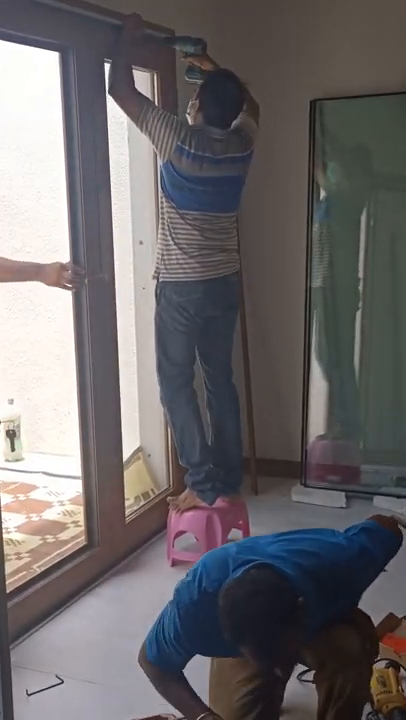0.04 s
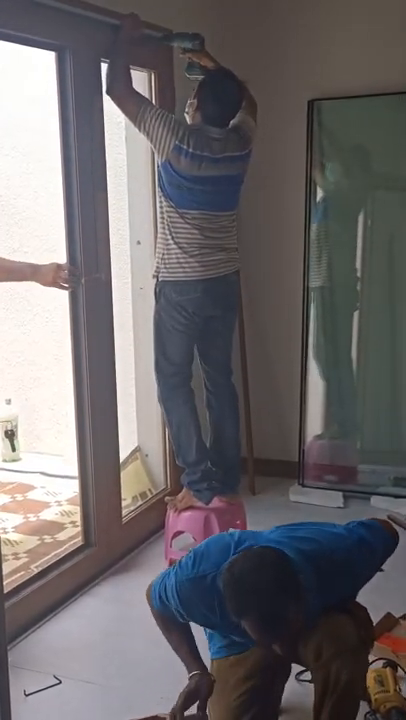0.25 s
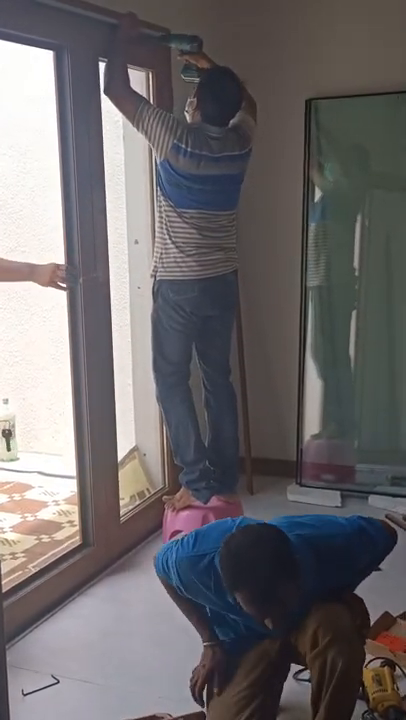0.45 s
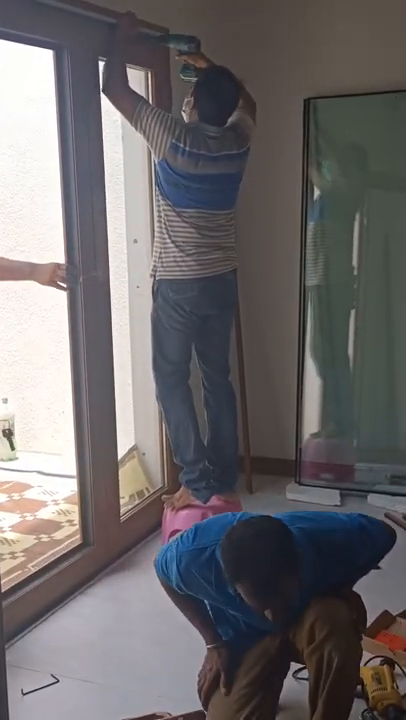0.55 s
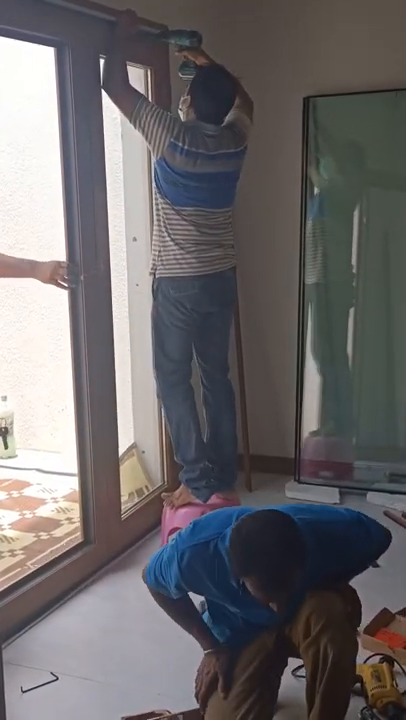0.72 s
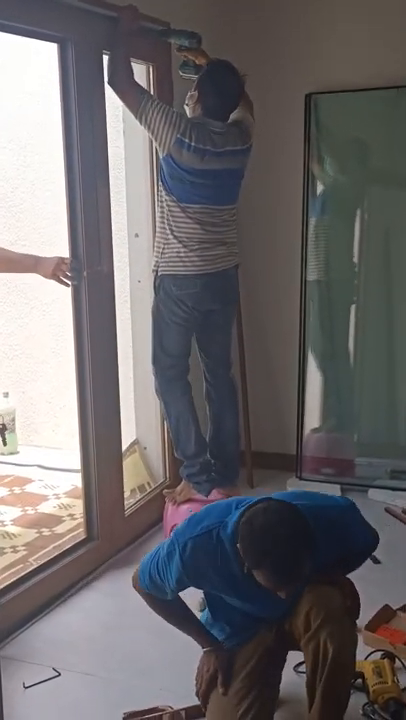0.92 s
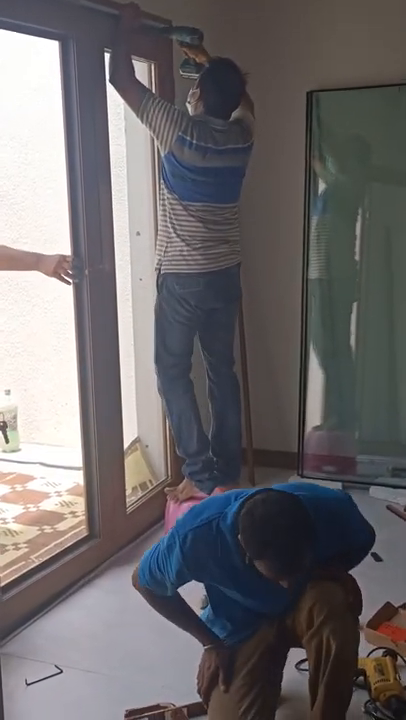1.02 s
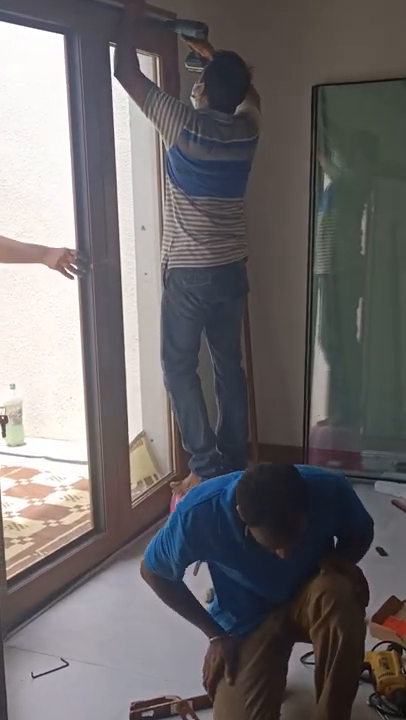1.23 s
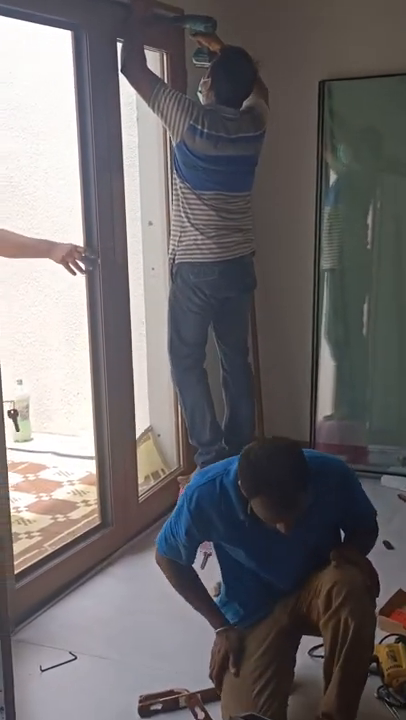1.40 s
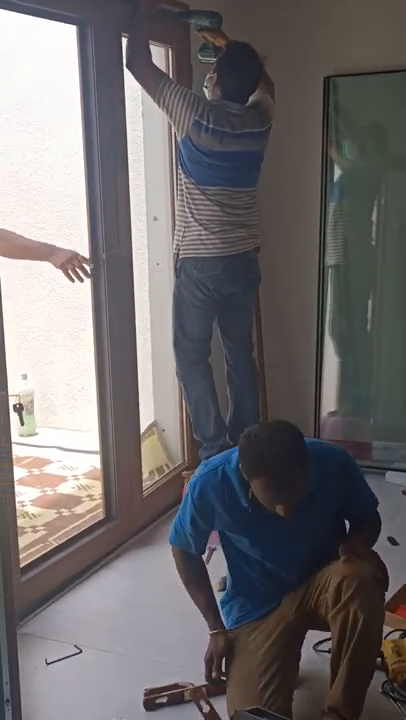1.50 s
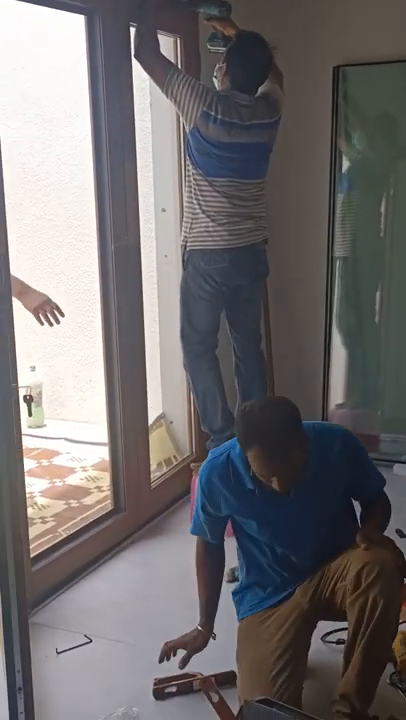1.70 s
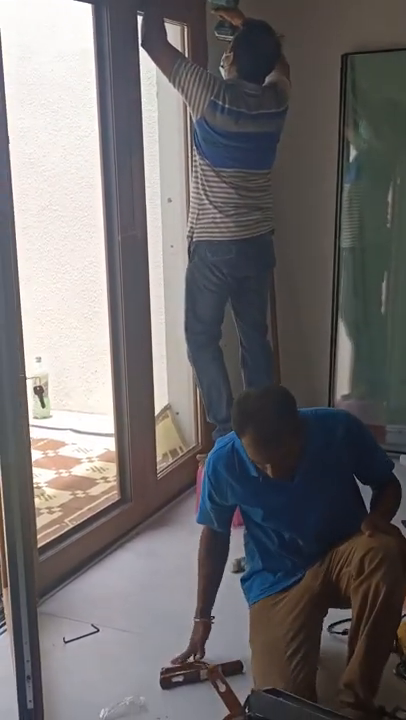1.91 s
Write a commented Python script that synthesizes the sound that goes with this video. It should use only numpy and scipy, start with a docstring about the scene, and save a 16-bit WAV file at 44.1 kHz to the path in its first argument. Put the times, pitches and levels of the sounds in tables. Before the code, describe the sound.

Knocks and clatter from a door being fitted echo in a bare room.

```python
"""A bare, tiled room where a glazed door is being fitted, heard on a stereo pair far enough off for the
echo to outweigh the direct sound. Two knocks and a few squeaks lead into heavy blows and a boom as a
part, probably the frame, sticks and slips. A light tick follows, then knocks that set the pane humming,
and another tick. A metal tool clacks down; last, something scrapes along with small squeaks and a bump.
The work sits a little right of centre, over low, steady room tone."""
import sys
import numpy as np
from scipy import signal
from scipy.fft import rfft, irfft
from scipy.io import wavfile
from scipy.ndimage import uniform_filter1d

SR = 44100
rng = np.random.default_rng(int(sys.argv[2]) if len(sys.argv) > 2 else 0)


def int16_out(signal):
    """Quantize to a 16-bit WAV file."""
    q = np.round(np.clip(np.atleast_2d(signal).T, -1, 1) * 32767)
    wavfile.write(sys.argv[1], SR, q.astype(np.int16))


N = 85995

# blows of the juddering frame: start_s, strength_db, rattle_s
JUDDER_BLOWS = [(0.2135, 7.5, 0.0053), (0.2425, 10.5, 0.0018), (0.2685, 10.5, 0.0052),
                (0.2990, 5.5, 0.0014), (0.3185, 2.5, 0.001)]
# their spectrum: frequency_hz, relative_db
JUDDER_SPECTRUM = [(25, -53), (40, -23), (75, -8.5), (160, 2), (300, -3.5), (520, 0.5), (640, -5.5),
                   (820, 3), (1050, -6), (1400, -4), (1950, -5.5), (2800, -8.5), (4100, -8), (4800, -14),
                   (7500, -17.5), (10500, -22.5), (12500, -35.5), (15500, -40)]
# modes of the frame with its pane: pitch_hz
FRAME_PITCHES = [74, 119, 158, 192, 228, 267, 390, 511, 551, 760, 799]
# the same modes, in that order: relative_db, t60_s
FRAME_MODES = [(-18.5, 1.42), (-14.5, 1.2), (-2, 0.58), (-3, 0.52), (1, 0.12), (-5, 0.33), (-3, 0.27),
               (-9, 0.99), (-5, 0.39), (-10, 1.05), (-3, 0.24)]
# successive pushes of the slips on those modes: strength_db
SLIP_PUSHES = [-34.5, -29, -33, -28.5, -48]

# knocks on the frame: start_s, strength_db, rattle_s
KNOCK_BLOWS = [(0.0, -3.5, 0.0067), (0.048, -9.5, .01), (0.7760, 0, 0.0069), (0.7965, -4, 0.0062),
               (0.818, -7, 0.0077), (0.888, -21, 0.022)]
# their spectrum: frequency_hz, relative_db
KNOCK_SPECTRUM = [(80, -1), (160, 6.5), (260, -0.5), (400, -2.5), (800, 1.5), (1100, -5), (1900, -3),
                  (3100, -6.5), (4050, -2), (4800, -14), (8000, -16.5), (10500, -21), (12500, -34),
                  (15500, -38)]
# two close modes of the pane: pitch_hz
PANE_PITCHES = [111.0, 118.6]
# the same modes, in that order: level_db, t60_s
PANE_MODES = [(-34.5, 0.71), (-40.5, 1)]

# the metal tool landing: start_s, strength_db, rattle_s
TOOL_BLOWS = [(1.356, -22, 0.012), (1.3745, -4.5, 0.0058), (1.3945, 4.5, 0.0062), (1.4185, -4.5, 0.0026),
              (1.448, -2.5, 0.023), (1.490, -5.5, 0.054)]
# its spectrum: frequency_hz, relative_db
TOOL_SPECTRUM = [(47, -66), (80, -17), (220, -13), (263, -9), (300, -9.5), (328, -9), (374, -11.5),
                 (509, -1.5), (725, -12), (884, -4), (965, -7), (3390, -6), (4410, -11.5), (10900, -22),
                 (15500, -47)]

# course of the scraping stroke: time_s, level_db
SCRAPE_STROKE = [(1.60, -48), (1.625, -41.5), (1.645, -34.5), (1.69, -37), (1.756, -36), (1.785, -50.5),
                 (1.86, -62), (1.95, -69.5)]
# its spectrum: frequency_hz, relative_db
SCRAPE_SPECTRUM = [(47, -43), (80, -9), (220, -4), (340, -10), (520, -0.5), (800, -3), (1450, -7),
                   (2400, -4), (3600, -6), (4700, -13), (7300, -10.5), (10500, -18.5), (12500, -28),
                   (15500, -32)]
# squeaks and groans of rubbing parts: start_s, length_s, pitch_hz, width_hz, level_db
SQUEAK_RUBS = [(0.151, 0.022, 4900, 2460, -43.5), (0.175, 0.034, 680, 820, -38),
               (0.185, 0.019, 2000, 1810, -38), (0.957, 0.034, 2300, 200, -48),
               (1.449, 0.065, 456, 265, -42), (1.575, 0.047, 1830, 1620, -38.5),
               (1.595, .016, 3330, 300, -39), (1.626, .045, 1550, 900, -39.5),
               (1.735, 0.038, 560, 243, -37.5), (1.92, 0.025, 2700, 1000, -41),
               (1.927, 0.016, 6600, 3950, -42)]

# light ticks: start_s, strength_db, rattle_s
TICK_BLOWS = [(0.472, -25, .003), (1.0915, -14, 0.0023)]
# their spectrum: frequency_hz, relative_db
TICK_SPECTRUM = [(150, 7), (600, 8), (1200, -1.5), (2400, 3), (4000, -4), (4800, -5), (6200, -2),
                 (10000, -6.5), (12500, -18), (15500, -35)]
# soft bumps: start_s, pitch_hz, level_db, t60_s
BUMPS = [(1.092, 205, -50.5, 0.57), (1.405, 260, -45, 0.21), (1.707, 233, -25.5, 0.078)]

# decay of the tiled room: frequency_hz, t60_s
ROOM_DECAY = [(100, 1.0), (250, 1), (600, 1.0), (1500, 0.89), (4000, 0.83), (8000, 0.69), (14000, 0.51)]
# likeness of diffuse sound at the two microphones: frequency_hz, correlation
MIC_CORRELATION = [(100, 0.99), (220, 0.98), (400, 0.89), (700, -0.068), (1500, -0.11), (3000, 0.029),
                   (14000, -0.11)]
# spectrum of the room tone: frequency_hz, relative_db
ROOM_TONE_SPECTRUM = [(20, -24), (30, -40), (43, 1.5), (55, -33), (80, 3.5), (130, -6), (220, -1.5),
                      (400, -14), (700, -8.5), (1200, -18), (4000, -24.5), (5000, -35), (10000, -36),
                      (15500, -45)]


def frame_judder(boom_start_s=0.2175, slip_period_s=0.026):
    """Quick, heavy stick-slip blows; evenly spaced pushes drive the frame's low modes into a boom."""
    modes = sum(ring(hz, db, t60, rise_s=0.0019) for hz, (db, t60) in zip(FRAME_PITCHES, FRAME_MODES))
    boom = np.zeros(N)
    for k, db in enumerate(SLIP_PUSHES):
        add(boom, boom_start_s + k * slip_period_s, amp(db) * modes)
    return boom + blows(JUDDER_BLOWS, JUDDER_SPECTRUM, crack=0.16, pan_db=-3.5)


def frame_knocks(hum_start_s=0.793):
    """Lighter knocks on the frame; with the second group, two close modes of the pane swell and beat."""
    low, high = [ring(hz, db, t60, rise_s=0.016) for hz, (db, t60) in zip(PANE_PITCHES, PANE_MODES)]
    hum = np.zeros(N)
    add(hum, hum_start_s, low - high)
    return hum + blows(KNOCK_BLOWS, KNOCK_SPECTRUM, crack=0.3, pan_db=-3.5)


def tool_clacks():
    """A metal tool is set down in several quick contacts, the last rattling longest."""
    return blows(TOOL_BLOWS, TOOL_SPECTRUM, crack=0.23, pan_db=-3)


def scrape(slips_per_s=1300, spread_db=6.5):
    """Dense, tiny slips of uneven size under one stroke."""
    sizes = amp(spread_db * np.minimum(rng.exponential(1, N), 4))
    signs = rng.choice([-1, 1], N)
    slipping = rng.random(N) < slips_per_s / SR
    slips = unit_rms(sizes * signs * slipping)
    stroke = amp(np.interp(np.arange(N) / SR, *np.transpose(SCRAPE_STROKE), left=-120))
    return tiled_room(coloured(slips * stroke, SCRAPE_SPECTRUM), pan_db=-3.5)


def squeaks():
    """Short rubs, each exciting one resonance."""
    frequencies = np.fft.rfftfreq(N, 1 / SR)
    out = np.zeros(N)
    for start_s, length_s, pitch_hz, width_hz, db in SQUEAK_RUBS:
        resonance = 1 / (1 + ((frequencies - pitch_hz) / width_hz * 2) ** 2)
        rub = irfft(rfft(rng.standard_normal(N)) * resonance, N)[:int(length_s * SR)]
        add(out, start_s, amp(db) * unit_rms(rub * np.hanning(len(rub))))
    return tiled_room(out, pan_db=-4)


def light_ticks():
    """Small contacts, more click than chatter."""
    return blows(TICK_BLOWS, TICK_SPECTRUM, crack=0.68, pan_db=-5)


def soft_bumps():
    """Handled parts bump, each sounding one hollow mode."""
    out = np.zeros(N)
    for start_s, hz, db, t60 in BUMPS:
        add(out, start_s, ring(hz, db, t60, rise_s=0.017))
    return out


def tiled_room(source, pan_db, direct_db=-13.5, early_db=1.5, early_s=0.028, build_s=0.0014):
    """Direct sound, strong early reflections off hard walls and a dense echo whose treble dies first."""
    hz, t, spectra = signal.stft(diffuse_noise(), SR, nperseg=512)
    t60 = value_at(ROOM_DECAY, hz)[:, None]
    tail = signal.istft(spectra * amp(-60 * t / t60) / np.sqrt(t60), SR, nperseg=512)[1][:, :N]
    age = np.arange(N) / SR
    build_up = 1 - np.exp(-age / build_s)
    early_lift = 1 + amp(early_db) * np.exp(-age / early_s)
    response = np.sqrt(2) * unit_energy(tail * build_up * early_lift)
    echo = signal.fftconvolve(source[None], response, axes=1)[:, :N]
    return (echo + amp(direct_db) * source) * amp([[pan_db / 2], [-pan_db / 2]])


def room_tone(level_db=-53):
    """Low, steady noise of the room and the open door."""
    gain = amp(value_at(ROOM_TONE_SPECTRUM, np.fft.rfftfreq(N, 1 / SR)))
    return amp(level_db) * unit_rms(irfft(rfft(diffuse_noise()) * gain, N))


def diffuse_noise():
    """White noise reaching the two microphones from all around: alike in the bass."""
    a, b = rfft(rng.standard_normal((2, N)))
    correlation = value_at(MIC_CORRELATION, np.fft.rfftfreq(N, 1 / SR))
    mid = a * np.sqrt((1 + correlation) / 2)
    side = b * np.sqrt((1 - correlation) / 2)
    return irfft(np.array([mid + side, mid - side]), N)


def blows(rows, spectrum, crack, pan_db):
    """Blows on one object, each ringing out in the room with its own dense echo."""
    out = np.zeros((2, N))
    for start_s, db, rattle_s in rows:
        force = np.zeros(N)
        add(force, start_s, amp(db) * contact(rattle_s, crack))
        out += tiled_room(coloured(force, spectrum), pan_db)
    return out


def contact(rattle_s, crack, size=4096):
    """One sharp click, then a dying chatter of tiny contacts; crack is the click's share of the energy."""
    decay = np.exp(-np.arange(size) / SR / rattle_s)
    chatter = flattened(rng.standard_normal(size) * rng.exponential(1, size) * decay)
    return np.sqrt(1 - crack) * chatter + np.sqrt(crack) * signal.unit_impulse(size)


def ring(hz, db, t60, rise_s):
    """One mode that swells and dies."""
    t = np.arange(N) / SR
    return amp(db - 60 * t / t60) * (1 - np.exp(-t / rise_s)) * np.sin(2 * np.pi * hz * t)


def coloured(x, spectrum, size=4096):
    """Applies a causal filter of unit energy with the given spectrum."""
    log_gain = np.log(amp(value_at(spectrum, abs(np.fft.fftfreq(size, 1 / SR)))))
    minimum_phase = np.exp(np.conj(signal.hilbert(log_gain)))
    taps = np.fft.ifft(minimum_phase).real[:size // 2]
    return signal.fftconvolve(x, unit_energy(taps))[:N]


def flattened(burst):
    """Evens out the broad humps of a random burst's spectrum."""
    spectrum = rfft(burst, 2 * len(burst))
    humps = np.sqrt(uniform_filter1d(abs(spectrum) ** 2, 9) + 1e-12)
    return unit_energy(irfft(spectrum / humps)[:len(burst)])


def value_at(table, hz):
    """Reads a table on a log-frequency axis."""
    frequencies, values = np.transpose(table)
    return np.interp(np.log(hz + 1), np.log(frequencies + 1), values)


def add(mix, start_s, sound):
    """Mixes a sound in at a time."""
    part = mix[round(start_s * SR):][:len(sound)]
    part += sound[:len(part)]


def amp(db):
    """Decibels to gain."""
    return 10 ** (np.asarray(db) / 20)


def unit_energy(x):
    """Scales to an energy of one."""
    return x / np.sqrt(np.sum(x ** 2) + 1e-20)


def unit_rms(x):
    """Scales to an rms of one."""
    return unit_energy(x) * np.sqrt(x.size)


def scene():
    """The work on the door over the room tone, as it reaches the microphones."""
    handling = light_ticks() + tool_clacks() + soft_bumps()
    return frame_judder() + frame_knocks() + handling + scrape() + squeaks() + room_tone()


def record(dry):
    """The recorder cuts off the highest treble."""
    edge_hz = 15480
    lowpass = signal.firwin(511, edge_hz, window=("kaiser", 9), fs=SR)
    return signal.oaconvolve(dry, lowpass[None], "same")


dry = scene()
out = record(dry)
int16_out(out)
```